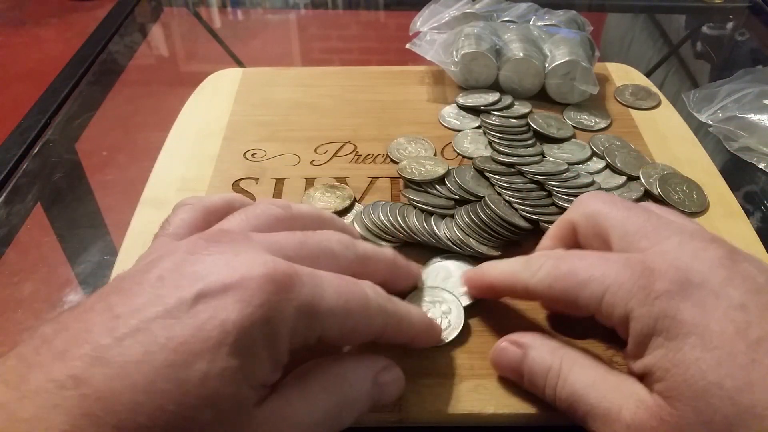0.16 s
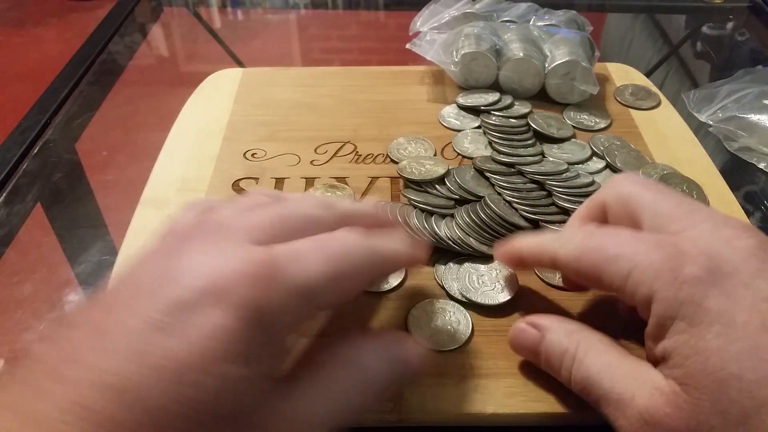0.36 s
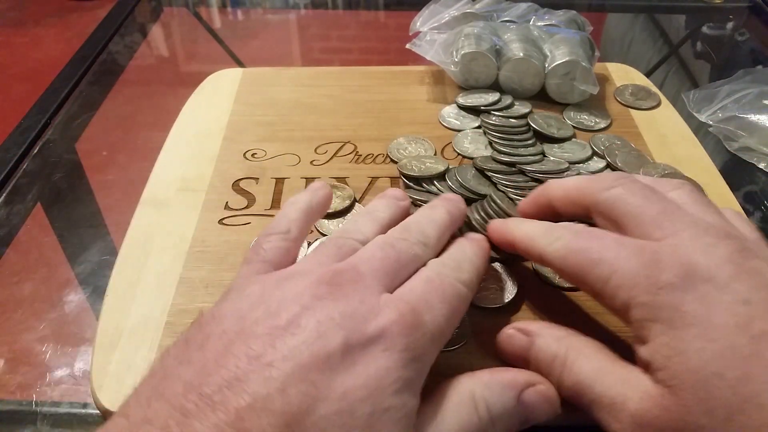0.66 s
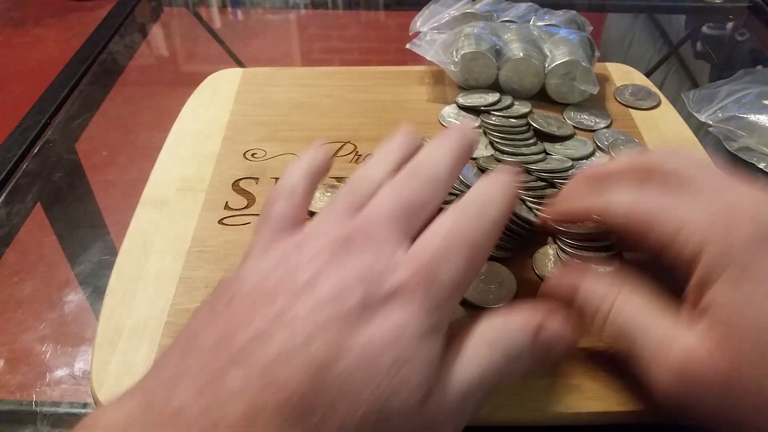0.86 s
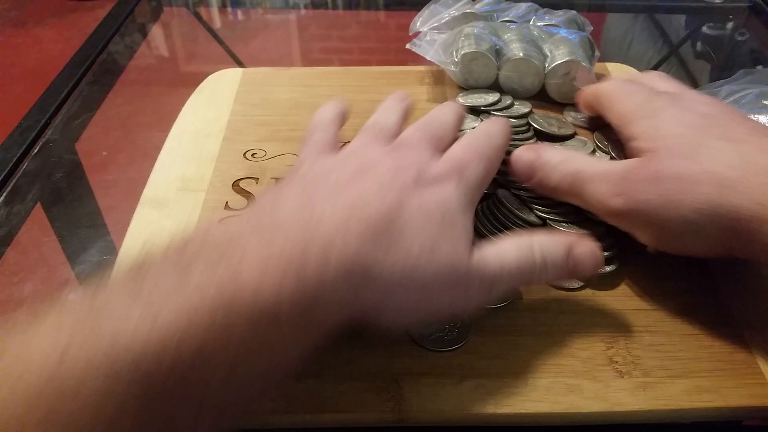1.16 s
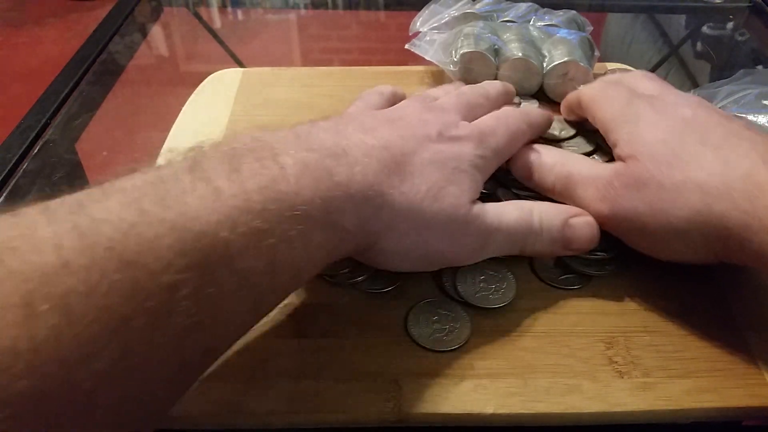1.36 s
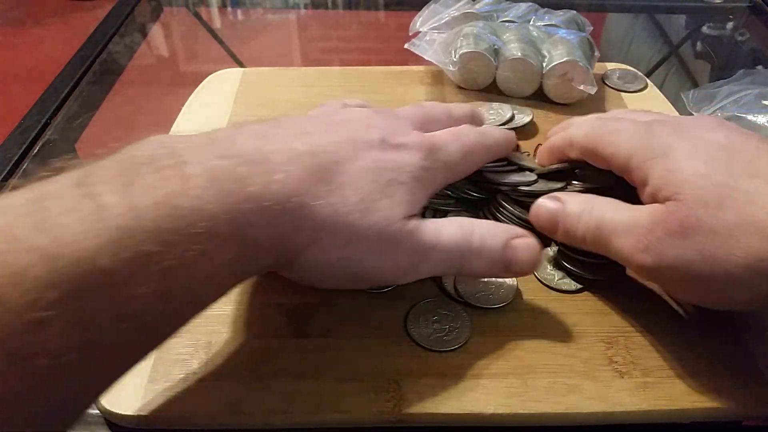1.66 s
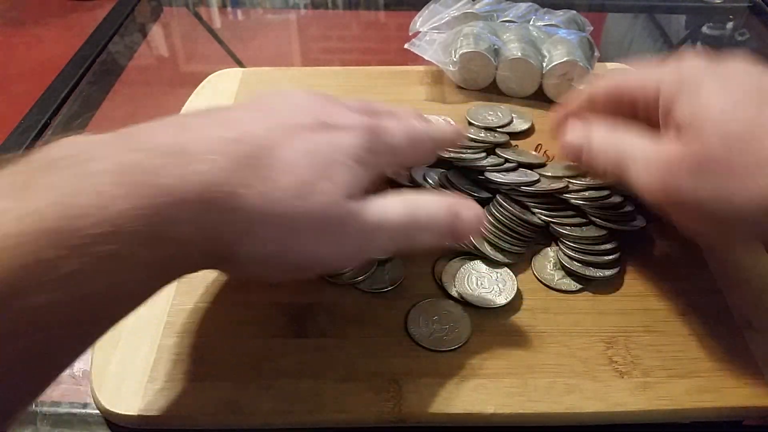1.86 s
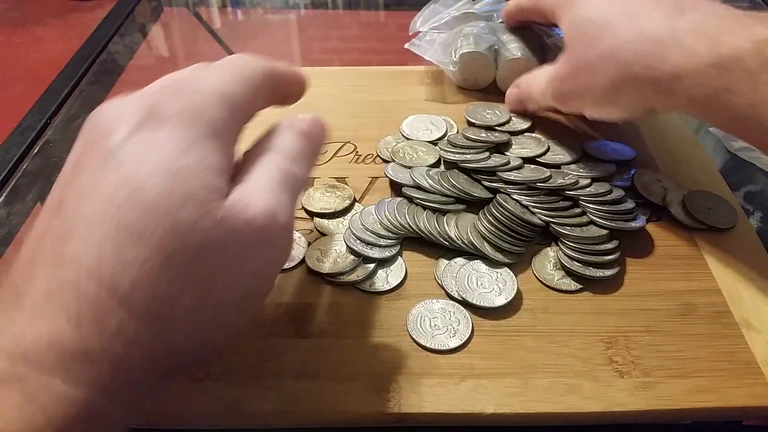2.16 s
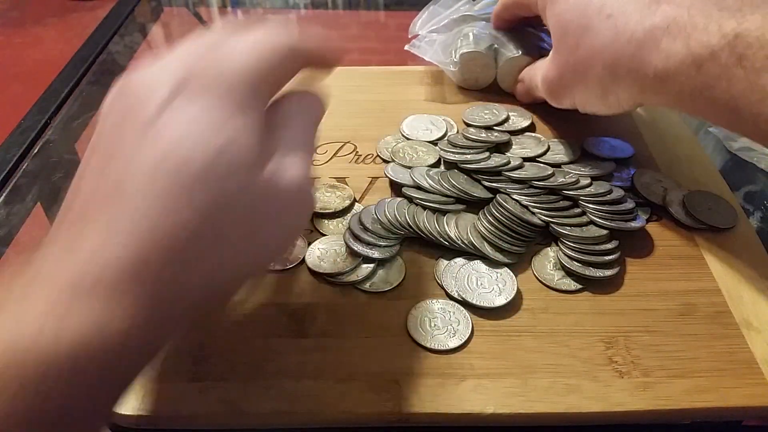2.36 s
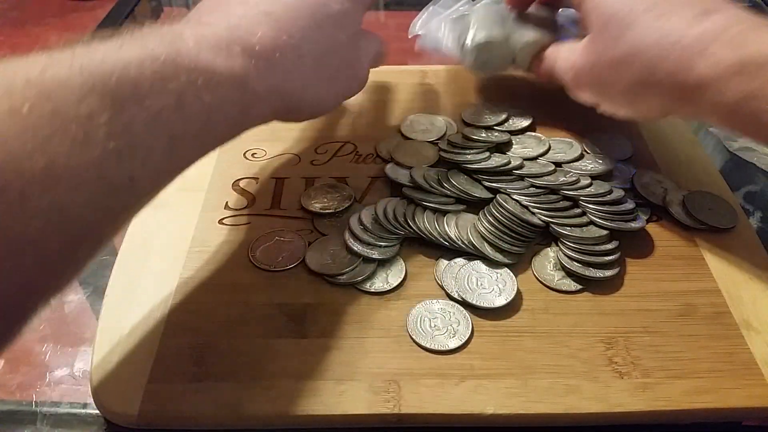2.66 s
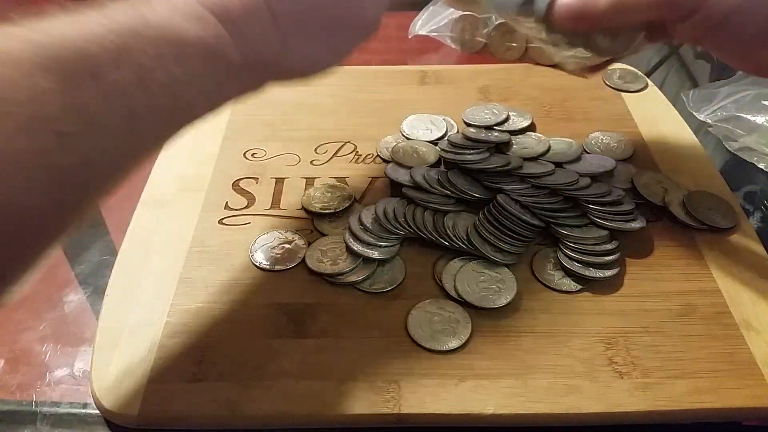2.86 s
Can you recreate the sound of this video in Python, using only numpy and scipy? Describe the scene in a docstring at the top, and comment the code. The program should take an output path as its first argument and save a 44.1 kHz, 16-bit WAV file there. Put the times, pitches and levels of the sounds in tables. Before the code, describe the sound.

Close up in a small room, loose coins clack and ring briefly, pause, then grind together in a busier shuffle on wood, ending with bag snaps, sharp coin clacks and light plastic crinkling.

```python
"""Coins shuffled on a board

Hands slide and shuffle a heap of silver coins on a wooden board, close to the microphone in a small room.
Noise bursts through short resonances make the coins clack; streams of tiny contacts make them grind.
Fluttering sines let loose coins ring high, and the board under them rumbles with bumps and thumps.
Now and then a hand catches a plastic bag of coins with dry snaps, and at the end lifts it, crackling."""
import sys
import numpy as np
from scipy import signal
from scipy.fft import rfft, irfft
from scipy.io import wavfile

SR = 44100
rng = np.random.default_rng(int(sys.argv[2]) if len(sys.argv) > 2 else 0)


def waveform_to_disk(signal):
    """Save audio, clipped to [-1, 1], as 16-bit WAV at the path in sys.argv[1]."""
    frames = np.transpose(np.atleast_2d(signal))
    scaled = np.clip(frames, -1, 1) * 32767
    samples = np.round(scaled).astype(np.int16)
    wavfile.write(sys.argv[1], SR, samples)


N = 132300
T = np.arange(N) / SR  # time axis [s]
HZ = np.fft.rfftfreq(2 * N, 1 / SR)  # frequency axis of the zero-padded spectrum [Hz]

# Room air spectrum: (frequency [Hz], level [dB])
AIR_SPECTRUM = [(20, -23), (37, -12), (55, -5.5), (120, 5), (300, -5), (700, -23), (2000, -19.5),
                (10000, -37), (16000, -26)]
AIR_DB = -54.5
# Steady hum tones: (frequency [Hz], rms level [dB])
HUM_TONES = [(38, -61), (120, -60)]
BASS_ALIKE = 0.84  # share both ports hear alike; the long waves of board and room differ less
# Decay of the room: (frequency [Hz], time to fall 60 dB [s])
ROOM_T60 = [(250, 0.89), (1700, 0.45), (4600, 0.32), (8000, 0.15), (13000, 0.17)]

# Loudness of the board's rumble: (time [s], level [dB])
RUMBLE_LEVEL = [(0, -50.5), (.39, -51.5), (.5, -57.5), (.68, -49.5), (1.17, -66), (1.28, -43), (1.43, -48),
                (1.56, -36.5), (1.8, -42.5), (2.05, -43.5), (2.3, -50), (2.68, -44.5), (2.85, -54),
                (3, -49.5)]
# Tone of the wooden board: (frequency [Hz], level [dB])
BOARD_SPECTRUM = [(60, -7), (120, -5.5), (185, -5.5), (220, 7), (265, -9.5), (380, -4), (560, -8),
                  (800, -17), (1500, -59)]
# Dull thumps of hands and stacks on the board: (time [s], level [dB], frequency [Hz])
THUMPS = [(0.378, -38, 219), (1.191, -46.5, 462), (1.803, -33.5, 210), (2.302, -36.5, 426),
          (2.655, -41, 108)]
THUMP_CYCLES = 2.3  # a thump peaks after this many swings

# Fine crinkling of the bag: (time [s], level [dB])
CRINKLE_LEVEL = [(2.14, -71), (2.2, -39.5), (2.7, -54), (2.84, -63), (3.0, -41.5)]
# Tone of the plastic: (frequency [Hz], level [dB])
PLASTIC_SPECTRUM = [(300, 2.5), (800, 0), (1500, -3), (2500, 1), (5000, -1), (9000, -16), (16000, -1)]

# How hard the heap is pushed along, before the GRIND_DB trim: (time [s], level [dB])
SLIDE_LEVEL = [(0, -31.5), (.08, -54), (.22, -43), (.28, -30), (.35, -51), (.39, -32.5), (.53, -53.5),
               (.78, -48.5), (.85, -42), (1.0, -59), (1.17, -66), (1.255, -45.5), (1.28, -32.5),
               (1.36, -37.5), (1.42, -44.5), (1.58, -23.5), (1.66, -26), (1.75, -34.5), (1.8, -23),
               (1.89, -34.5), (2.03, -34), (2.16, -48.5), (2.29, -43), (2.37, -57.5), (2.61, -41.5),
               (2.65, -32.5), (2.75, -67.5), (3.0, -47.5)]
# Tone of rim scraping on rim: (frequency [Hz], level [dB])
GRIND_SPECTRUM = [(300, 5.5), (800, -6), (1500, 5.5), (2100, 2), (4200, 4), (5500, -0.5), (7900, 5.5),
                  (9600, -6.5), (10400, 2), (13200, -1.5), (16000, -5.5)]
GRIND_PER_S, GRIND_SPREAD_DB, GRIND_DB = 1300, 3, -0.97
GRIND_HISS = .45  # rms of the steady rubbing against grains of rms 1
PAIR_SPREAD_DB = 9  # scale of the uneven spectrum of each rubbing pair

# Modes of three coins: name: [(frequency [Hz], level [dB], time to fall 60 dB [s])]
COIN_MODES = { "a": [(10335, -6, .26), (13230, 0, .15), (13310, -3, .1)], "b": [(9960, 0, .15),
              (10280, -5, .17), (12900, -7, .17)], "c": [(5560, -16, .36), (5910, -20, .25),
              (10270, -6, .17), (12915, -2, .19)], }
# Coins knocked loose, levels before the mode's own: (time [s], level [dB], coin [name])
RINGS = [(0.318, -31, "a"), (0.356, -22.5, "a"), (0.381, -25, "a"), (0.836, -33.5, "a"), (1.27, -22.5, "b"),
         (1.343, -26, "b"), (1.804, -24, "c"), (2.059, -35, "c"), (2.086, -31, "c"), (2.28, -25.5, "a"),
         (2.628, -24, "c"), (2.709, -22.5, "c"), (2.724, -28, "c")]
RATTLE_DB, RATTLE_S = -3.5, 0.0068  # offset from the ring's level before colouring; decay time
FLUTTER, FLUTTER_S = .75, .004  # rms depth at CUT_HZ, less for lower modes; smoothing time

# Coin on coin, levels before the layer trim:
# (time [s], knock level [dB], clack level [dB], tick level [dB], how the coins meet [name], stroke [name])
CLACKS = [(0.006, -36, -31, -35, "edge", "skid"), (0.065, -52, -32.5, -37.5, "edge", "hit"),
          (0.235, -38, -29.5, -31, "edge", "hit"), (0.248, -37, -26.5, -35, "flat", "hit"),
          (0.271, -39, -20.5, -25, "flat", "skid"), (0.292, -45, -28, -31, "edge", "skid"),
          (0.308, -35, -22, -21, "edge", "skid"), (0.316, -33, -23.5, -26, "edge", "skid"),
          (0.3565, -38.5, -12.5, -21, "flat", "skid"), (0.379, -55, -15.5, -32, "flat", "skid"),
          (0.615, -43.5, -38.5, -39.5, "edge", "skid"), (0.654, -41, -43, -52, "hollow", "skid"),
          (0.678, -31.5, -25.5, -28.5, "hollow", "skid"), (0.921, -48, -39.5, -35.5, "edge", "skid"),
          (1.267, -29.5, -28, -27, "deep", "hit"), (1.286, -34, -23, -22, "edge", "skid"),
          (1.314, -30, -23, -23.5, "edge", "skid"), (1.345, -39, -31, -27, "edge", "skid"),
          (1.444, -42, -34, -34.5, "edge", "hit"), (1.545, -28, -30, -25, "edge", "skid"),
          (1.575, -42, -30, -20, "edge", "skid"), (1.648, -39, -27, -24.5, "flat", "skid"),
          (1.683, -29.5, -25, -21, "edge", "skid"), (1.694, -44, -25, -21.5, "edge", "hit"),
          (1.765, -50, -23.5, -21.5, "edge", "skid"), (1.792, -48, -19.5, -17.5, "flat", "skid"),
          (1.801, -59, -14.5, -20, "stack", "skid"), (1.858, -54, -29, -22, "edge", "skid"),
          (1.872, -50, -29.5, -19.5, "edge", "skid"), (1.963, -40, -22.5, -29, "deep", "hit"),
          (1.975, -32.5, -21.5, -23, "deep", "hit"), (2.027, -37, -28.5, -21, "edge", "skid"),
          (2.059, -37, -33, -28, "edge", "hit"), (2.084, -37, -31.5, -35, "edge", "skid"),
          (2.122, -36.5, -31.5, -27, "flat", "skid"), (2.2715, -32, -23, -21.5, "stack", "skid"),
          (2.282, -49, -32, -23, "edge", "skid"), (2.6255, -25.5, -12.5, -34, "stack", "skid"),
          (2.629, -46, -15.5, -38, "stack", "hit"), (2.655, -38, -19.5, -30, "flat", "skid"),
          (2.7045, -36, -17.5, -30, "flat", "hit")]
# Dry snaps as fingers catch the plastic bag and the coins in it, levels before the layer trim:
# (time [s], knock level [dB], clack level [dB], tick level [dB], how the coins meet [name], stroke [name])
BAG_SNAPS = [(1.192, -37, -49.5, -64, "deep", "skid"), (1.372, -28.5, -37, -43, "deep", "hit"),
             (1.388, -22.5, -22, -30.5, "flat", "hit"), (2.203, -29.5, -33, -28, "deep", "hit"),
             (2.361, -39, -55, -55, "deep", "hit"), (2.386, -24.5, -28.5, -45, "flat", "hit"),
             (2.398, -25, -41, -51, "deep", "hit"), (2.403, -23.5, -38, -54, "deep", "skid"),
             (2.481, -35, -56, -59, "deep", "hit"), (2.524, -31.5, -49, -41, "deep", "hit"),
             (2.56, -29, -29.5, -18, "flat", "hit"), (2.595, -32.5, -29, -26, "edge", "hit"),
             (2.642, -19.5, -19, -37, "flat", "hit"), (2.947, -32, -33.5, -50, "flat", "hit")]
# Short low resonance of a contact: (frequency [Hz], width [Hz], level [dB])
KNOCK_MODES = [(1506, 270, 0)]
# Clack by how the coins meet: name: [(frequency [Hz], width [Hz], level [dB])]
CLACK_MODES = { "flat": [(4200, 1310, 3), (6730, 1860, -1.5)], "edge": [(3800, 4000, -3.5),
               (7900, 1200, 4)], "deep": [(2670, 280, 2), (4100, 1500, -3)], "stack": [(3360, 420, -1.5),
               (4270, 220, 3), (6760, 2500, -7.5)], "hollow": [(1720, 45, 4.5), (2560, 120, 0.5),
               (7450, 2000, -9.5)], }
# Short high resonances of a contact: (frequency [Hz], width [Hz], level [dB])
TICK_MODES = [(10360, 290, 4.5), (13900, 2300, -3)]
# Broad clack that goes out into the room: (frequency [Hz], width [Hz], level [dB])
CLACK_ALL_ROUND = [(4700, 5200, 0)]
# A square hit peaks at once, a skid swells as the rims catch: stroke: time to the peak [s]
RISE_S = {"hit": .0005, "skid": .0016}
DETUNE, UNEVEN_DB = .025, 2.2  # scatter from contact to contact: log pitch, strength
CHATTER_DB, CHATTER_S = -7, .007  # the coins chatter on after a contact: level against it, decay time
ALIKE = 0.17  # share of a contact that both ports hear alike

# The two microphone ports differ: (frequency [Hz], left minus right level [dB])
PORT_DIFFERENCE = [(40, -4.5), (130, 11.5), (400, 3), (2000, 9), (3800, 13.5), (5000, 22), (8000, 20.5),
                   (9500, 0), (10400, -2), (12000, -11), (16000, -4.5)]
LAG_S = .000045  # the left port hears it later
CUT_HZ = 15850  # top of the recorded band


def amp(db):
    """Decibels to gain."""
    return 10 ** (np.asarray(db) / 20)


def unit(x):
    """Scales to rms 1."""
    return x / np.sqrt(np.mean(x ** 2) + 1e-20)


def at_hz(points, hz):
    """Reads a spectrum on a log-frequency axis."""
    f, value = np.transpose(points)
    return np.interp(np.log(hz + 1), np.log(f + 1), value)


def level(points):
    """A dB curve as a gain for every sample."""
    return amp(np.interp(T, *np.transpose(points)))


def colour(x, gain):
    """Filters by a gain for each frequency."""
    return irfft(rfft(x, 2 * N) * gain)[..., :N]


def add(mix, s, sound):
    """Mixes a stereo sound in at time s."""
    part = mix[:, max(round(s * SR), 0):][:, :sound.shape[1]]
    part += sound[:, :part.shape[1]]


def noise(size, alike):
    """A pair of partly alike noises."""
    a, b = rng.standard_normal((2, size))
    c = np.clip(alike, 0, 1)
    return np.array([a, c * a + np.sqrt(1 - c * c) * b])


def smooth(x, decay_s):
    """Lets each sample die away exponentially into the next ones."""
    return signal.lfilter([1], [1, -np.exp(-1 / (decay_s * SR))], x)


def grains(per_s, spread_db, decay_s, hiss, alike):
    """A random stream of tiny contacts of uneven size over a steady rubbing."""
    uneven_db = spread_db * np.minimum(rng.exponential(1, N), 4)
    size = amp(uneven_db) * (rng.random(N) < per_s / SR)
    power = smooth(size ** 2, decay_s / 2)  # power dies twice as fast as amplitude
    return noise(N, alike) * np.sqrt(power / power.mean() + hiss ** 2)


def background():
    """Quiet room air as shaped noise, and a low hum of steady sines."""
    air = amp(AIR_DB) * unit(colour(noise(N, BASS_ALIKE), amp(at_hz(AIR_SPECTRUM, HZ))))
    hum = 0
    for hz, db in HUM_TONES:
        hum = hum + amp(db) * np.sqrt(2) * np.sin(2 * np.pi * (hz * T + rng.random()))
    return air + hum


def room(x, build_s):
    """A diffuse noise tail that builds up and dies faster in most of the treble."""
    hz, t, z = signal.stft(rng.standard_normal((2, SR // 2)), SR, nperseg=256)
    decay = 1000 ** (-t / at_hz(ROOM_T60, hz)[:, None])
    tail = signal.istft(z * decay, SR, nperseg=256)[1]
    tail = tail * (1 - np.exp(-(T[:tail.shape[1]] / build_s) ** 2))
    return signal.fftconvolve(x, tail / np.linalg.norm(tail[0]), axes=1)[:, :N]


def board():
    """The wooden board rumbles under the sliding coins and thumps when something is set down."""
    bumps = grains(per_s=500, spread_db=0, decay_s=0.0075, hiss=0.42, alike=BASS_ALIKE)
    out = unit(colour(bumps, amp(at_hz(BOARD_SPECTRUM, HZ)))) * level(RUMBLE_LEVEL)
    for s, db, hz in THUMPS:
        u = T[:SR // 4] * hz / THUMP_CYCLES  # 1 at the peak
        thump = u * np.exp(1 - u) * np.sin(2 * np.pi * THUMP_CYCLES * u)
        add(out, s, amp(db) * np.tile(thump, (2, 1)))
    return out


def crinkling():
    """Small creases of the bag give way under the fingers, each a tiny noise burst."""
    creases = grains(per_s=210, spread_db=5.5, decay_s=0.0014, hiss=0.53, alike=ALIKE)
    return unit(colour(creases, amp(at_hz(PLASTIC_SPECTRUM, HZ)))) * level(CRINKLE_LEVEL)


def grinding(count=6, size=64):
    """Rims scrape over each other as the heap moves; each rubbing pair has its own set of resonances."""
    scrape = 0
    for _ in range(count):
        bands_hz = np.linspace(0, SR / 2, size)
        pair_db = PAIR_SPREAD_DB * np.interp(HZ, bands_hz, rng.uniform(-1.87, 1, size))
        rub = grains(GRIND_PER_S / count, GRIND_SPREAD_DB, decay_s=0.0011, hiss=GRIND_HISS, alike=ALIKE)
        thin_bass = HZ / (HZ + 300)
        scrape = scrape + colour(rub, amp(at_hz(GRIND_SPECTRUM, HZ) + pair_db) * thin_bass)
    return amp(GRIND_DB) * unit(scrape) * level(SLIDE_LEVEL)


def ringing():
    """Loose coins rattle briefly and ring in their modes, fluttering as they brush their neighbours."""
    out, rattle, t = np.zeros((2, N)), np.zeros((2, N)), T[:SR // 2]
    for s, db, coin in RINGS:
        add(rattle, s, amp(db + RATTLE_DB) * np.exp(-t / RATTLE_S) * noise(len(t), ALIKE))
        for hz, mode_db, t60 in COIN_MODES[coin]:
            phase = 2 * np.pi * rng.random((2, 1))
            wobble = unit(smooth(noise(len(t), ALIKE), FLUTTER_S))
            flutter = 1 + FLUTTER * hz / CUT_HZ * wobble
            decay = 1000 ** (-t / t60)
            add(out, s, amp(db + mode_db) * decay * flutter * np.sin(2 * np.pi * hz * t + phase))
    return out + colour(rattle, amp(at_hz(GRIND_SPECTRUM, HZ)))


def resonances(modes, hz):
    """Damped resonances, a little different in pitch and strength for each contact."""
    total = 0
    for k, (centre, width, db) in enumerate(modes):
        shift, uneven = rng.standard_normal(2)
        centre = centre * np.exp(DETUNE * shift)
        peak = 1j * hz * width / (centre ** 2 - hz ** 2 + 1j * hz * width)
        total = total + (-1) ** k * amp(db + UNEVEN_DB * uneven) * peak  # neighbours in opposite phase
    return total * (hz / (hz - 700j)) ** 2  # thins out the bass below 700 Hz


def contacts(rows, clack, chatter_db, chatter_s):
    """Each contact is a short burst and a weaker chatter after it, which excite knock, clack and tick."""
    out, t = np.zeros((2, N)), T[:2048]
    hz = np.fft.rfftfreq(len(t), 1 / SR)
    for s, *levels_db, meeting, stroke in rows:
        u = t / RISE_S[stroke]
        burst = (u * np.exp(1 - u)) ** 2
        chatter = amp(chatter_db) * (1 - np.exp(-u ** 2)) * np.exp(-t / chatter_s)
        for modes, db in zip((KNOCK_MODES, clack[meeting], TICK_MODES), levels_db):
            strike = noise(len(t), ALIKE) * (burst + chatter)
            part = irfft(rfft(strike) * resonances(modes, hz))
            onset_rms = np.sqrt(np.mean(part[:, :176] ** 2, axis=1, keepdims=True))  # first 4 ms
            add(out, s - RISE_S[stroke] / 2, amp(db) * part / onset_rms)
    return out


def scene():
    """Coins, bag and board in the room."""
    coins = amp(-2.0) * contacts(CLACKS, CLACK_MODES, CHATTER_DB, CHATTER_S)
    all_round = dict.fromkeys(CLACK_MODES, CLACK_ALL_ROUND)
    thrown = contacts(CLACKS, all_round, CHATTER_DB, CHATTER_S)  # heard only through the room
    bag = amp(-4.5) * contacts(BAG_SNAPS, CLACK_MODES, chatter_db=-19, chatter_s=0.0068)
    rubbing = grinding() + crinkling()
    sent = amp(-10.5) * thrown + amp(-15) * bag + amp(-12.0) * rubbing
    return coins + bag + rubbing + ringing() + board() + room(sent, build_s=0.016) + background()


def record(dry):
    """The left port hears the mids and the right the top treble; then the band limit."""
    ratio = amp(at_hz(PORT_DIFFERENCE, HZ))
    left = ratio * np.exp(-2j * np.pi * HZ * LAG_S)
    ports = np.array([left, np.ones_like(ratio)]) * np.sqrt(2 / (1 + ratio ** 2))  # keeps the summed power
    lowpass = signal.firwin(401, CUT_HZ, window=("kaiser", 8), fs=SR)
    return signal.oaconvolve(colour(dry, ports), lowpass[None], "same")


dry = scene()
out = record(dry)
waveform_to_disk(out)
```